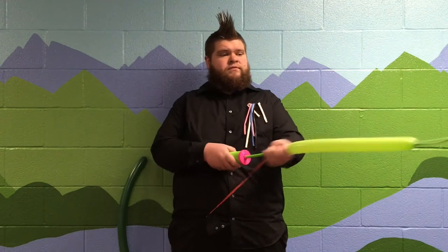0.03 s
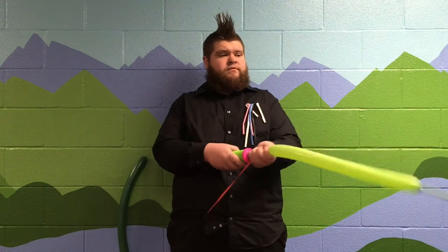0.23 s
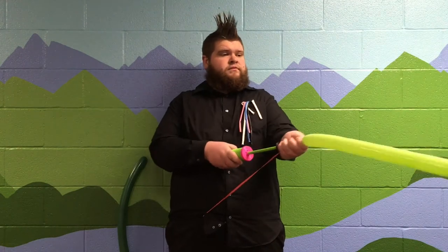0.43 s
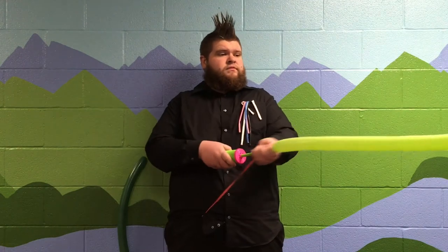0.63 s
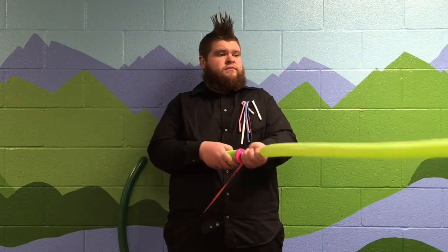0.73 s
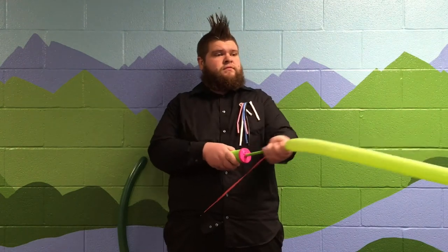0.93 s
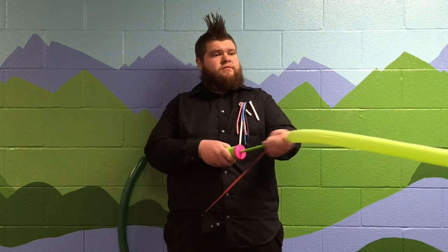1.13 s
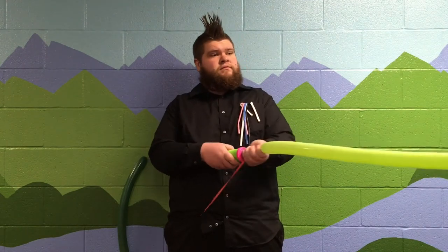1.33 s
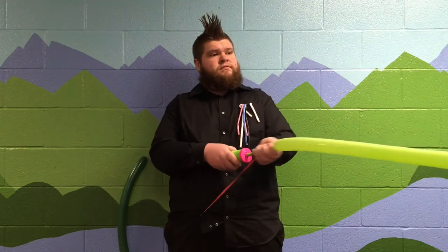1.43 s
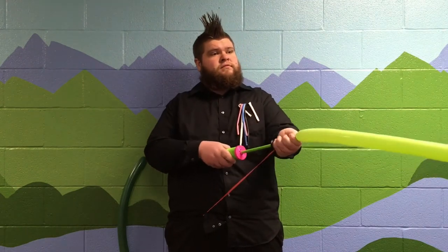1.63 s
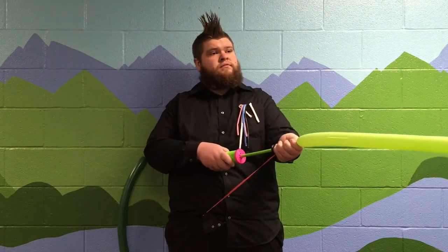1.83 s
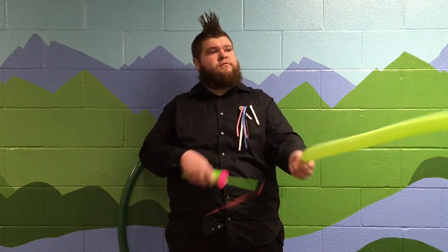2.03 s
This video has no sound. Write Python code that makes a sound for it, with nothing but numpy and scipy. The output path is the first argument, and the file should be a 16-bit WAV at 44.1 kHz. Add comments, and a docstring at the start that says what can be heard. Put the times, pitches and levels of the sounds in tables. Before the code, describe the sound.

A balloon hand pump works three fast cycles. Pushes start with a tick near 0.03, 0.58 and 1.16 s, rush with bright hiss and faint wavering whistle, and clack at 0.21, 0.78 and 1.34. Pulls open with hollow pops at 0.35, 0.92 and 1.48, then hiss. Faint air wisps and rubber rubbing from 1.8 surround a snap at 2.0. Short hard-room echoes, quiet low rumble and hum.

```python
"""A two-way hand pump fills a long balloon in three quick push-pull cycles, in a small room with block walls.
Each push opens with a valve tick, hisses as two bands of noise shaped by hand speed, and ends in a clack.
Each pull opens with a hollow valve pop and hisses again; a wavering tone whistles faintly at full flow.
At last noise wisps and rubs as the balloon's neck is worked off the nozzle, and it snaps free.
The knocks are noise bursts with dying sines; echoes and a diffuse tail lie over low rumble and hum."""
import sys
import numpy as np
from scipy import signal
from scipy.fft import rfft, irfft, next_fast_len
from scipy.io import wavfile
from scipy.ndimage import map_coordinates

SR = 44100
rng = np.random.default_rng(int(sys.argv[2]) if len(sys.argv) > 2 else 0)


def bounce(signal):
    """Save signal as a 16-bit WAV file at the path given by the first command-line argument."""
    frames = np.transpose(np.atleast_2d(signal))
    limited = np.clip(frames, -1, 1)
    pcm = np.round(limited * 32767).astype(np.int16)
    wavfile.write(sys.argv[1], SR, pcm)


N = 92301  # samples, about 2.1 s


def amp(db):
    """Decibels to a linear factor."""
    return 10 ** (np.asarray(db) / 20)


def unit(x):
    """Scale a signal to rms 1."""
    return x / np.sqrt(np.mean(x ** 2) + 1e-20)


def along(points, hz):
    """Read (f/Hz, value) points on a log frequency axis."""
    f, v = np.transpose(points)
    return np.interp(np.log(hz + 1), np.log(f + 1), v)


def clock():
    """The time of every sample in seconds."""
    return np.arange(N) / SR


def wobble(rate):
    """A smooth random curve with rate knots a second."""
    knots = rng.standard_normal(4096)
    return map_coordinates(knots, [clock() * rate], mode="wrap")


def filtered(x, response):
    """Multiply the spectrum of x by a complex response of frequency."""
    m = next_fast_len(N + SR // 2)
    hz = np.fft.rfftfreq(m, 1 / SR)
    return irfft(rfft(x, m) * response(hz), m)[:N]


def noise(spectrum):
    """Coloured noise of rms 1."""
    return unit(filtered(rng.standard_normal(N), lambda hz: amp(along(spectrum, hz))))


def pulse(spectrum, size=2048):
    """The minimum-phase pulse with this spectrum, scaled to energy 1."""
    hz = np.fft.rfftfreq(size, 1 / SR)
    cepstrum = irfft(np.log(amp(along(spectrum, hz))))
    # folding the cepstrum onto positive time packs the energy at the onset
    cepstrum[1:size // 2] *= 2
    cepstrum[size // 2 + 1:] = 0
    h = irfft(np.exp(rfft(cepstrum)))
    return h / np.linalg.norm(h)


def add(out, s, x):
    """Mix x into out from time s in seconds."""
    i = max(round(s * SR), 0)
    out[i:i + len(x)] += x[:len(out[i:])]


def crack(spectrum, t60):
    """A short burst of contact noise: faded, whitened, faded again and then coloured."""
    t = np.arange(8192) / SR
    fade = amp(-60 * t / t60)
    phases = np.angle(rfft(rng.standard_normal(len(t)) * fade))
    burst = irfft(np.exp(1j * phases)) * np.sqrt(fade)
    burst = burst / np.linalg.norm(burst)
    return signal.fftconvolve(burst, pulse(spectrum))[:len(t)]


def ring(modes):
    """The dying tones of a struck body: one decaying sine for each mode, cut at an eighth of a second."""
    t = np.arange(SR // 8) / SR
    return sum(amp(db - 60 * t / t60) * np.sin(2 * np.pi * hz * t) for hz, db, t60 in modes)


def strokes(rows, power):
    """Loudness as a power of hand speed, which rises and falls as a sine arch."""
    loudness = np.zeros(N)
    for start, fastest, end, db in rows:
        travel = np.interp(clock(), [start, fastest, end], [0, 1, 0])
        loudness += amp(db) * np.sin(np.pi / 2 * travel) ** power
    return loudness


def air(rows, body, jet, body_power, jet_power, body_db, jet_db, flutter_db):
    """A broad rush in the barrel and a thin valve jet follow hand speed by their own powers and flutter."""
    rush = amp(body_db) * strokes(rows, body_power) * noise(body)
    hiss = amp(jet_db) * strokes(rows, jet_power) * noise(jet)
    return (rush + hiss) * amp(flutter_db * wobble(100))


def push_air():
    """The valve's thin jet hisses almost at once; the broad rush in the barrel needs more speed."""
    # push strokes: start t/s, fastest t/s, end t/s, level/dB before the layer trims
    pushes = [(.068, .15, 0.23, -38), (.618, .73, 0.803, -40.5), (1.188, 1.295, 1.36, -39.5)]
    # colour of the rush in the barrel: f/Hz, relative level/dB per Hz
    barrel_rush = [(150, 10.5), (600, 1.5), (1000, -4), (2000, -12), (2520, 16), (2850, 6.5), (4000, 9),
                   (5000, -1.5), (6200, 12.5), (8000, -6), (10300, -14), (16000, -1)]
    # colour of the valve jet: f/Hz, relative level/dB per Hz
    valve_jet = [(5000, -18.5), (10500, -10.5), (12500, -7), (14500, -2), (16000, -7.5)]
    return air(pushes, barrel_rush, valve_jet, body_power=1.6, jet_power=0.32,
               body_db=-2.5, jet_db=6, flutter_db=1.5)


def pull_air():
    """Drawn air rushes in the barrel, and its jet swells a little later with hand speed."""
    # pull strokes: start t/s, fastest t/s, end t/s, level/dB before the layer trims
    pulls = [(.365, .44, 0.5, -39), (.94, 1.01, 1.082, -40.5), (1.495, 1.565, 1.589, -36)]
    # colour of the rush in the barrel: f/Hz, relative level/dB per Hz
    barrel_rush = [(150, 5.5), (600, 3), (1000, 0), (2000, -6), (2520, 8.5), (2900, 2.5), (4000, 3.5),
                   (5000, -3), (6200, 4), (7500, 0.5), (10000, 4.5), (11200, -10), (16000, -3.5)]
    # colour of the valve jet: f/Hz, relative level/dB per Hz
    valve_jet = [(5000, -51), (11000, -10), (12600, 1), (13400, -9), (14600, 0.5), (16000, -10)]
    return air(pulls, barrel_rush, valve_jet, body_power=1.15, jet_power=1.4,
               body_db=2.0, jet_db=2.5, flutter_db=0.5)


def whistle():
    """A wavering tone at the nozzle; turbulence smears part of it into a narrow band of noise."""
    # whistles: loudest t/s, half length t/s, centre f/Hz, level at the loudest/dB, airy share (0-1)
    whistles = [(0.164, 0.059, 1294, -45, 0.66), (0.46, 0.027, 1297, -44, 0.6),
                (0.737, 0.037, 1331, -39.5, 0.14), (1.018, 0.031, 1304, -46, .8),
                (1.296, 0.044, 1319, -44, 0.16), (1.574, 0.053, 1310, -46, 0.43)]
    waver_hz, eddy_rate = 13, 130  # pitch scatter in Hz, random knots a second
    out = np.zeros(N)
    for s, half, hz, db, airy in whistles:
        flow = np.exp(-((clock() - s) / half) ** 2)
        phase = 2 * np.pi * np.cumsum(hz + waver_hz * wobble(eddy_rate)) / SR
        tone = np.sqrt(2) * np.sin(phase)
        eddies = wobble(eddy_rate) * np.sin(phase) + wobble(eddy_rate) * np.cos(phase)
        out += amp(db) * flow * (np.sqrt(1 - airy) * tone + np.sqrt(airy) * eddies)
    return out


def pops():
    """The valve flap slaps shut, a puff of suction follows and the barrel rings hollowly."""
    # pops that open the pulls: t/s, level/dB before the layer trims
    openings = [(0.345, -1), (0.9159, 0.5), (1.4783, 0)]
    # colour of the flap's slap: f/Hz, relative level/dB
    flap_slap = [(500, -23), (2000, -4), (3800, 2.5), (6000, -2), (9500, -9.5), (13000, -9.5),
                 (16000, -5.5)]
    # colour of the suction puff: f/Hz, relative level/dB
    suction_puff = [(60, -47), (160, 0), (320, -2.5), (600, 3.5), (900, 2), (1200, -5.5), (1700, -5.5),
                    (2200, -23), (5000, -37), (16000, -67)]
    # modes of the air column in the barrel: f/Hz, level/dB relative to the pop, t60/s
    air_column = [(887.4, -33, 0.068), (1678, -39, 0.038)]
    # colour of the barrel's diffuse ring: f/Hz, relative level/dB
    barrel_ring = [(100, -45), (650, -19.5), (1000, -0.5), (1700, -11), (2400, -33), (8000, -51)]
    lag_s = 0.001232  # the air moves just after the flap
    out = np.zeros(N)
    for s, db in openings:
        add(out, s, amp(db - 3.5) * crack(flap_slap, t60=0.0055))
        # suction pulls the pressure negative
        add(out, s + lag_s, -amp(db + 2.5) * pulse(suction_puff))
        add(out, s + lag_s, -amp(db) * ring(air_column))
        add(out, s + lag_s, amp(db - 9) * crack(barrel_ring, t60=0.14))
    return out


def knocks(rows, modes, spectrum, crack_db, crack_t60):
    """Each contact cracks and rings the struck body briefly."""
    out = np.zeros(N)
    for s, db in rows:
        add(out, s, amp(db) * ring(modes))
        add(out, s, amp(db + crack_db) * crack(spectrum, crack_t60))
    return out


def clacks():
    """The plunger hits its stop: a hard crack over the plastic's short, partly low tones."""
    # stop hits: t/s, level/dB before the layer trims
    stops = [(.2083, -5.5), (.7763, -6), (1.3447, -5)]
    # plastic modes: f/Hz, level/dB relative to the hit, t60/s
    plastic = [(165.6, -32, 0.17), (616, -28, 0.03), (1506, -44.5, 0.026), (2477, -18.5, 0.012),
               (3030, -30, 0.023)]
    # colour of the contact: f/Hz, relative level/dB
    contact = [(300, 0), (900, -11), (2000, -3), (3300, -3.5), (4500, -20), (7000, -11), (16000, -24)]
    return knocks(stops, plastic, contact, crack_db=-1, crack_t60=0.015)


def ticks():
    """Three valve ticks open the pushes, and a faint one comes before the snap: cracks with light tones."""
    # ticks: t/s, level/dB before the layer trims
    contacts = [(.0293, -9), (.5802, -4.5), (1.1572, -8.5), (1.9405, -29.5)]
    # plastic modes: f/Hz, level/dB relative to the tick, t60/s
    plastic = [(703, -16.5, 0.024), (2630, -24.5, 0.043), (5800, -27.5, 0.027)]
    # colour of the contact: f/Hz, relative level/dB
    contact_colour = [(100, -6), (850, 8), (1400, 2.5), (4400, -2), (6000, -2.5), (15000, 2)]
    return knocks(contacts, plastic, contact_colour, crack_db=-1, crack_t60=0.018)


def leak():
    """Air slips past the neck as wisps of high noise."""
    # wisps: start t/s, fastest t/s, end t/s, level/dB
    wisps = [(1.8, 1.82, 1.84, -64), (2.0, 2.048, 2.08, -53)]
    # colour of the escaping air: f/Hz, relative level/dB per Hz
    wisp_colour = [(5000, -55), (9000, -4), (12000, -1), (16000, -4)]
    return strokes(wisps, power=2.0) * noise(wisp_colour)


def rubbing():
    """Fingers and rubber rub on the nozzle; sticking and slipping flutters the noise."""
    # rubs: start t/s, fastest t/s, end t/s, level/dB before the flutter
    rubs = [(1.92, 1.965, 2.11, -51.5)]
    # colour of the friction: f/Hz, relative level/dB per Hz
    friction = [(300, -19), (700, -12), (1500, -7), (3800, 0.5), (5000, -5), (7000, 1.5), (10000, -5),
                (16000, 2)]
    stick_slip = amp(2.5 * wobble(200))
    return strokes(rubs, power=0.91) * noise(friction) * stick_slip


def snap():
    """The neck snaps off the nozzle: a crack with three brief high tones."""
    # snaps: t/s, level/dB before the layer trims
    releases = [(2.0061, -4.5)]
    # modes: f/Hz, level/dB relative to the snap, t60/s
    snap_tones = [(2440, -19.5, 0.035), (3100, -31, 0.025), (3710, -21.5, 0.049)]
    # colour of the contact: f/Hz, relative level/dB
    contact = [(400, -43), (700, -8), (1100, -3.5), (1900, -10), (2500, 2), (4200, 1.5), (5500, -5.5),
               (11000, -24), (16000, -17)]
    return knocks(releases, snap_tones, contact, crack_db=0.5, crack_t60=0.024)


def walls(x):
    """Hard surfaces close by return delayed, duller copies of the sound."""
    # early echoes: delay t/s, level/dB before the wall colour
    echoes = [(.00338, -1.6), (.0172, -15)]
    # colour of the wall reflection: f/Hz, level/dB
    wall_colour = [(1000, 0), (4000, -4.5), (8000, -9)]

    def reflection(hz):
        delays = sum(amp(db) * np.exp(-2j * np.pi * hz * s) for s, db in echoes)
        return amp(along(wall_colour, hz)) * delays

    return x + filtered(x, reflection)


def room(x, build_s):
    """The short diffuse tail, decaying noise that crossfades to a new response as the pump moves."""
    # decay time of the tail: f/Hz, t60/s
    decay = [(150, .35), (1000, .39), (3000, .42), (8000, .32), (15000, .25)]
    # colour of the tail: f/Hz, level/dB
    tail_colour = [(300, -4), (650, -10), (1050, -2), (2500, -6), (8000, -8), (15000, -5)]
    shift_s = .14  # the moving pump meets a new room response this often
    wet = np.zeros(N)
    for s in np.arange(0, N / SR + shift_s, shift_s):
        hz, t, z = signal.stft(rng.standard_normal(SR // 2), SR, nperseg=256)
        fade = amp(-60 * t / along(decay, hz)[:, None])
        tail = signal.istft(z * fade, SR, nperseg=256)[1]
        # the tail swells in before it decays
        tail = tail * (1 - np.exp(-(np.arange(len(tail)) / SR / build_s) ** 2))
        share = np.sqrt(np.clip(1 - np.abs(clock() - s) / shift_s, 0, 1))
        wet += signal.fftconvolve(x * share, tail / np.linalg.norm(tail))[:N]
    return filtered(wet, lambda hz: amp(along(tail_colour, hz)))


def background():
    """Ventilation rumble as steady coloured noise, and a low hum as one sine."""
    # colour of the rumble: f/Hz, relative level/dB per Hz
    rumble_colour = [(25, -36), (55, 3), (75, -1), (125, -18), (160, -5), (200, -15.5), (300, -20.5),
                     (600, -31.5), (1200, -38.5), (8000, -48)]
    rumble_db, hum_db, hum_hz = -46, -58, 59.5  # rms levels in dB, pitch in Hz
    hum = np.sqrt(2) * np.sin(2 * np.pi * hum_hz * clock())
    return amp(rumble_db) * noise(rumble_colour) + amp(hum_db) * hum


def scene():
    """Air, rubber and knocks feed the diffuse room; pops, clacks and snap also echo off the walls."""
    flow = push_air() + pull_air() + whistle() + rubbing() + leak()
    light_ticks = ticks()
    hits = pops() + clacks() + snap()
    flow_tail = amp(-1.0) * room(flow, build_s=0.011)
    knock_tail = amp(-0.5) * room(hits + light_ticks, build_s=0.0041)
    direct = flow + light_ticks + walls(hits)
    return (direct + flow_tail + knock_tail + background())[None]


def record(dry):
    """Nothing is kept above the band limit."""
    top_hz = 15850
    return filtered(dry[0], lambda hz: hz < top_hz)[None]


dry = scene()
out = record(dry)
bounce(out)
```